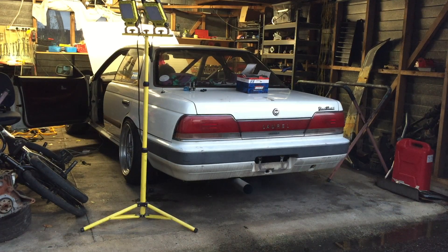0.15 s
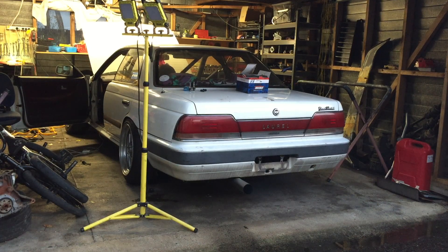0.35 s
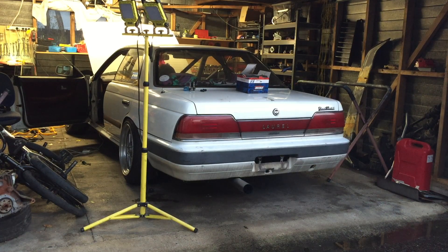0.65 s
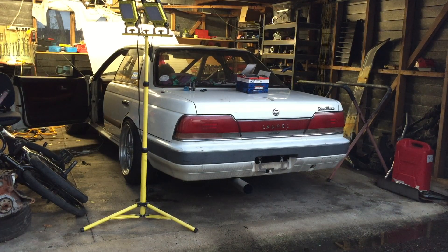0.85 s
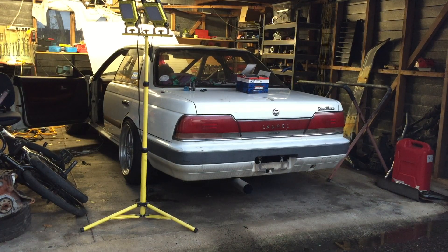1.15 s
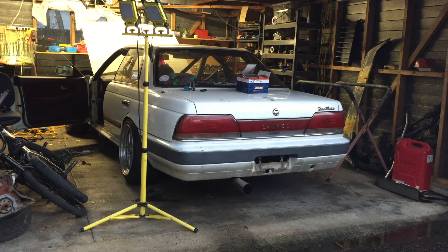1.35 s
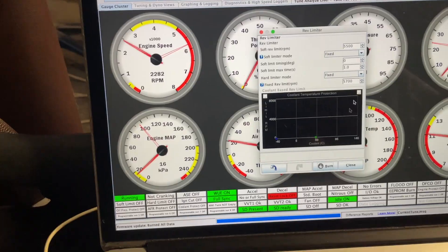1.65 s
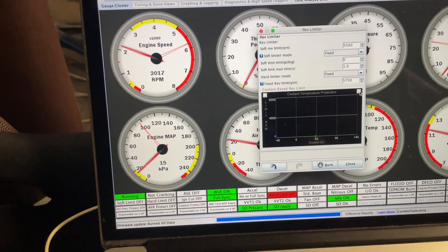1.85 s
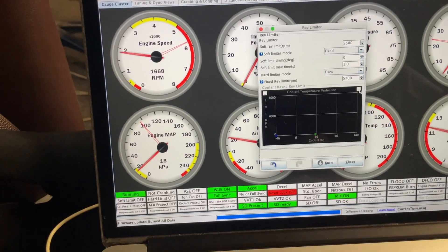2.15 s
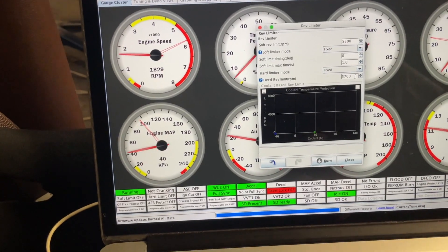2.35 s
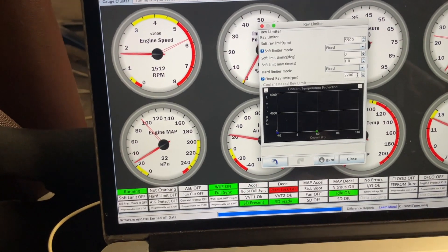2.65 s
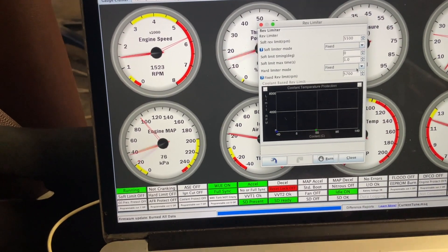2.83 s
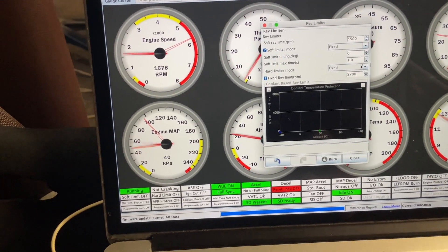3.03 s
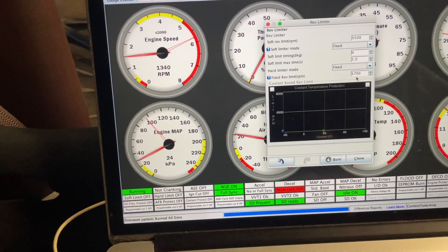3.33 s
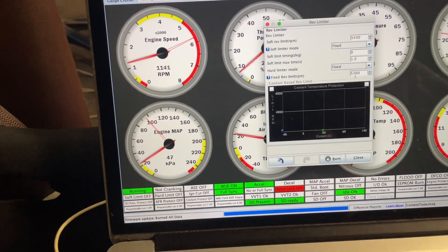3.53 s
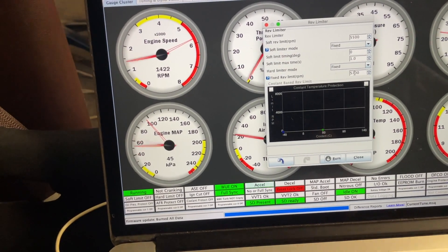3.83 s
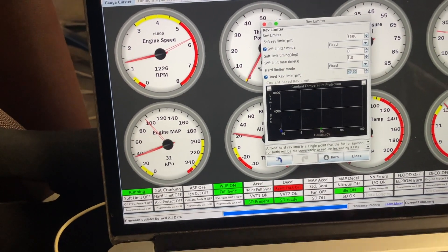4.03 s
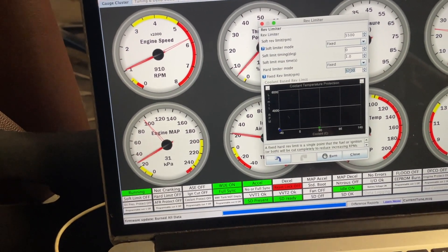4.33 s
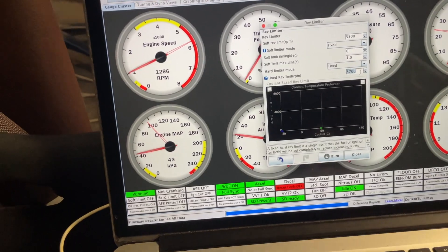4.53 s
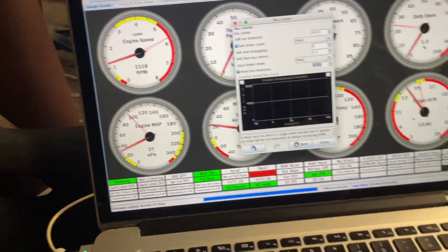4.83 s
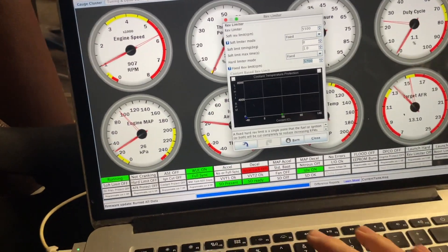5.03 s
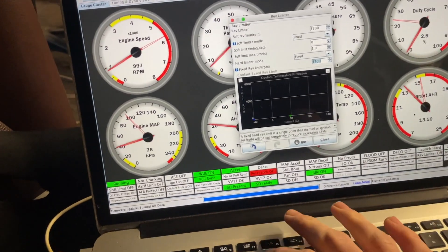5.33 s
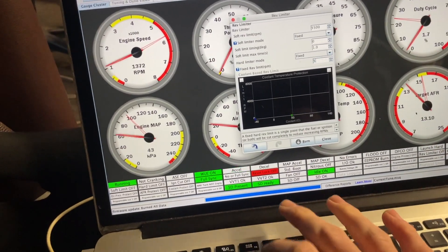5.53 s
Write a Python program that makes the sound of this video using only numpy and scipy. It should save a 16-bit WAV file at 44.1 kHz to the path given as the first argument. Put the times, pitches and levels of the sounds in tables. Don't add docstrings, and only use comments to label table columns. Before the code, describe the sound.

Raspy exhaust revs with sharp cracks cut suddenly to a low cabin drone, repeatedly blipped while sinking toward idle, with faint laptop key ticks.

```python
import sys
import numpy as np
from scipy import signal
from scipy.fft import rfft, irfft, next_fast_len
from scipy.io import wavfile
from scipy.ndimage import uniform_filter1d

SR = 44100
rng = np.random.default_rng(int(sys.argv[2]) if len(sys.argv) > 2 else 0)


def wav_out(sig):
    wavfile.write(sys.argv[1], SR, np.round(np.clip(np.atleast_2d(sig).T, -1, 1) * 32767).astype(np.int16))


def nominal_scale(level):
    x = np.asarray(level, float) / 20
    return 10 ** x


N = 250488
CUT_S = 1.602

# (frequency [Hz], level [dB per Hz])
GARAGE_WHIRR = [(140, -30), (230, 7.5), (492, -10), (1470, -24.5), (2330, -42.5), (3040, -29), (3770, -24),
                (12000, -42), (15600, -70.5), (22000, -120)]
# (frequency [Hz], level [dB per Hz])
CABIN_WHIRR = [(140, -39), (230, -3), (266, -14.5), (417, -7), (826, -18.5), (1710, -18), (2000, -23.5),
               (5620, -37), (7400, -40), (9620, -77.5), (16300, -120)]
GARAGE_WHIRR_DB, CABIN_WHIRR_DB = -38, -48.5

# (time [s], peak [dB], pitch [Hz])
KEY_TICKS = [
    (4.795, -48, 4500),
    (5.089, -47, 5070),
    (5.570, -50, 10000),
    (5.576, -41, 21000),
    (5.574, -44.5, 5500),
]
# (time [s], pitch [Hz], level [dB])
PUMP_WHINES = [
    [(2.45, 805, -49), (2.7, 795.3, -48), (2.9, 785, -45), (3.1, 751, -50.5), (3.3, 728, -51)],
    [(3.7, 706, -48), (3.9, 647, -48), (4.05, 677, -53), (4.25, 627, -52)],
]

# (frequency [Hz], level [dB per Hz])
TAIL_HISS = [(350, -38), (600, -1.5), (768, -10.5), (1040, 3.5), (1180, -1), (1430, 3.5), (2040, -2),
             (2270, -10.5), (2990, -7), (3730, -19), (4400, -14.5), (5630, -20), (9490, -22), (15100, -33),
             (16000, -44.5)]
# (frequency [Hz], level [dB per Hz])
CABIN_HISS = [(350, -37), (600, -27), (633, -10), (785, -10), (961, -14), (1190, -10.5), (1290, -14),
              (1740, -11), (2020, -15), (3900, -19.5), (7150, -28.5), (7960, -53.5), (9240, -32),
              (11500, -38), (15000, -61)]
# (frequency [Hz], width [Hz], level [dB])
PIPE = [(261, 79, -3), (348, 37, -1.5), (434.6, 31, -1.5), (532, 30, -3)]
# (frequency [Hz], width [Hz], level [dB])
TIP = [(1180, 30, -14), (1374, 133, 31), (1760, 77, -20.5), (1876, 180, 15.5), (3160, 220, 17.5),
       (4350, 400, -38)]
# (frequency [Hz], width [Hz], level [dB])
PANELS = [(278, 20, -7.5), (325.4, 28, -4), (359.4, 13.5, 1), (405.7, 5.2, 10), (440, 37, -1),
          (568, 56, 0.5)]
# (frequency [Hz], width [Hz], level [dB])
DASH = [(730, 430, -8.5), (1205, 35, 8.5), (1320, 110, -7.5), (2010, 150, 0), (2550, 25, -13)]
# (time [s], peak [dB])
CRACKS = [
    (0.1726, -25.5),
    (0.1932, -16.5),
    (0.7636, -28.5),
    (0.8509, -45),
    (1.0098, -34),
    (1.034, -24),
    (1.053, -12.5),
    (1.1318, -15),
    (1.1724, -13),
]

# (frequency [Hz], side minus mid [dB])
CABIN_SIDE = [(60, -26.5), (125, -13), (250, -7.5), (500, -9), (1500, -2.5), (8000, -0.5)]
# (frequency [Hz], level [dB])
CABIN_MICROPHONE = [(30, 0), (7550, 0), (7650, -45), (8800, -45), (8950, 0), (13000, 0), (13800, -30)]

# (time [s], firing rate [Hz])
TAIL_REVS = [(0.0, 49.1), (0.154, 46.45), (0.4, 68.91), (0.86, 42.82), (0.976, 40.92), (1.068, 51.2),
             (1.118, 45.97), (1.354, 69.25), (1.6, 56.5)]
# (time [s], firing rate [Hz])
CABIN_REVS = [(1.61, 109.2), (2.055, 80.46), (2.25, 92.8), (2.63, 71.1), (2.705, 74.7), (2.75, 72.75),
              (2.88, 87), (3.385, 55.8), (3.46, 65), (3.52, 58.45), (3.66, 75.05), (4.175, 45.02),
              (4.47, 67.46), (5.0, 39.8), (5.12, 49.6), (5.175, 45.8), (5.42, 70.4), (5.68, 55.73)]
CLIMB_BEND = 1.3

# (time [s], held [s], first load [0-1], last load [0-1])
TAIL_PEDAL = [
    (-0.05, 0.15, 0.19, 0),
    (0.156, 0.22, 0.81, 0.33),
    (0.994, 0.09, 0.78, 1),
    (1.111, 0.04, 0.6, 0.45),
    (1.146, 0.16, 0.89, 0.71),
]
# (time [s], held [s], first load [0-1], last load [0-1])
CABIN_PEDAL = [
    (2.054, 0.11, 0.46, 0.7),
    (2.642, 0.076, 0.74, 0.9),
    (2.748, 0.15, 0.82, 0.3),
    (3.385, 0.11, 0.82, 1.03),
    (3.528, 0.11, 0.9, 0.69),
    (4.202, 0.29, 0.41, 0.49),
    (5.048, 0.11, 0.51, 0.95),
    (5.192, 0.22, 0.95, 0.95),
]
TAIL_PRESS_S, TAIL_LIFT_S = 0.064, 0.06
CABIN_PRESS_S, CABIN_LIFT_S = 0.043, 0.064
STUMBLE_S, GULP_S = 0.09, 0.12

# (time [s], held [s], first strength [0-1], last
TAIL_BURN = [
    (0.14, 0.206, 0.48, 0.5),
    (0.987, 0.12, 0.52, 0.65),
    (1.124, 0.16, 0.55, 0.6),
]
# (time [s], held [s], first strength [0-1], last strength [0-1])
CABIN_BURN = [
    (2.07, 0.15, 0.62, 0.74),
    (2.66, 0.056, 0.55, 0.52),
    (2.771, 0.11, 0.58, 0.78),
    (3.39, 0.105, 0.4, 0.64),
    (3.541, 0.15, 0.46, 0.49),
    (4.19, 0.22, 0.36, 0.6),
    (5.05, 0.091, 0.44, 0.47),
    (5.186, 0.22, 0.47, 0.74),
]
CATCH_S, FADE_S = 0.041, 0.065
# (time [s], held [s], first depth [0-1], last depth [0-1])
FUEL_LULLS = [
    (0.8, 0.17, 0.57, 0.5),
    (4.86, 0.17, 0.35, 0.7),
]
LULL_LOAD, LULL_DB = 0.96, -6.5

# (frequency [Hz], pumping on shut throttle [dB], burning at full load [dB])
TAIL_BOOM = [(43.2, -42, -44), (51.7, -21, -10.5), (57.6, -28.5, -12.5), (79, -25.5, -19),
             (112.5, -31, -14), (119.2, -18.5, -10.5), (141, -30, -19.5), (176.7, -22.5, -15),
             (248, -25.5, -16), (270, -64, -28.5)]
# (frequency [Hz], pumping on shut throttle [dB], burning at full load [dB])
CABIN_BOOM = [(39, -31.5, -21), (48, -20, -17), (65, -29, -16.5), (81.2, -24, -15.5), (97, -21.5, -11.5),
              (111, -24.5, -15.5), (149, -24.5, -17.5), (160.3, -32, -16.5), (177, -25, -21.5),
              (225, -43, -29.5), (280, -60.5, -38), (400, -82, -48.5)]
TAIL_ORDERS_DB = [-1.2, 1.73, -0.9, -10.5]
CABIN_ORDERS_DB = [0.55, -3.5, -6, -11]
BURN_ORDERS_DB = [-1, 1, 0.55, 4]
# (frequency [Hz], -1 opposed to 1 together)
TAIL_CLASH = [(60, -1), (130, -0.9), (165, -0.2), (200, 0.5)]
# (frequency [Hz], -1 opposed to 1 together)
CABIN_CLASH = [(60, -1), (100, -1), (140, -0.5), (170, 0.5)]
NOTE_WANDER_DB = 0.7

# (coasting at 60 Hz [dB], speed [dB per Hz], full load [dB], stumble after a lift [dB], snap open [dB])
TAIL_LAWS = [(-31, 0.8, 2.5, -12.5, 10.2), (-31.5, 0.25, -13, 29.5, 6), (-39.5, 0.07, 11, 2, 0.5),
             (-52, 0.58, 21.5, 2, 1.5), (-55, 0.27, 15.5, -3.5, 8)]
# (coasting at 60 Hz [dB], speed [dB per Hz], full load [dB], stumble after a lift [dB], snap open [dB])
CABIN_LAWS = [(-48.5, 0.17, 10.5, 4.9, 1.7), (-36, 0.01, 10, 17, 0.1), (-56.5, 0.14, 9.5, 0.1, 5.4),
              (-70.5, 0.17, 13.5, 0.1, 0.1), (-76.5, 0.099, 3.5, 0.1, 14)]


def unit(x):
    return x / np.sqrt(np.mean(x ** 2))


def read(table):
    s, *columns = np.transpose(table)
    return [np.interp(np.arange(N) / SR, s, column) for column in columns]


def colour(x, points):
    hz, db = np.transpose(points)
    size = next_fast_len(N + SR)
    log_hz = np.log(np.arange(size // 2 + 1) * SR / size + 1)
    gain = nominal_scale(np.interp(log_hz, np.log(hz), db, left=-90, right=-90))
    return irfft(rfft(x, size) * gain, size)[:N]


def ring(x, modes):
    out = 0
    for k, (hz, width_hz, db) in enumerate(modes):
        b, a = signal.iirpeak(hz, hz / max(width_hz, 5), SR)
        out = out + (-1) ** k * nominal_scale(db) * signal.lfilter(b, a, x)
    return out


def flicker(rate):
    hold = int(SR / rate)
    steps = np.repeat(rng.standard_normal(N // hold + 1), hold)
    return 1.03 * uniform_filter1d(steps, hold)[:N]


def lagging(x, lag_s):
    keep = np.exp(-1 / (lag_s * SR))
    return signal.lfilter([1 - keep], [1, -keep], x)


def echoes(x, t60_s, wet_db):
    t = np.arange(int(0.5 * SR)) / SR
    tail = rng.standard_normal(len(t)) * np.exp(-np.log(1000) * t / t60_s) * (t > 0.002)
    tail = tail / np.linalg.norm(tail)
    return x + nominal_scale(wet_db) * signal.fftconvolve(x, tail)[:N]


def bursts(events, decay_s):
    start = np.zeros(N)
    for s, db, *_ in events:
        start[int(s * SR)] = nominal_scale(db)
    envelope = signal.lfilter([1], [1, -np.exp(-1 / (decay_s * SR))], start)
    return envelope * rng.standard_normal(N)


def split(x, edges_hz, levels_db):
    low, under = (signal.sosfiltfilt(signal.butter(2, hz, fs=SR, output="sos"), x) for hz in edges_hz)
    parts = (low, under - low, x - under)
    return [nominal_scale(db) * unit(part) for db, part in zip(levels_db, parts)]


def whirr(points, db):
    return nominal_scale(db + flicker(15)) * unit(colour(rng.standard_normal(N), points))


def keys():
    return sum(ring(bursts([key], 0.00062), [(key[2], 1800, 9)]) for key in KEY_TICKS)


def whine():
    out = np.zeros(N)
    t = np.arange(N) / SR
    for table in PUMP_WHINES:
        hz, db = read(table)
        begin_s, end_s = table[0][0], table[-1][0]
        on = np.clip(np.minimum(t - begin_s, end_s - t) / 0.017, 0, 1)
        level = on * nominal_scale(db - 3 + 2 * flicker(25))
        out += level * np.sin(2 * np.pi * np.cumsum(hz + 10 * flicker(40)) / SR)
    return out


def revs(table):
    s, hz = np.transpose(table)
    place = np.interp(np.arange(N) / SR, s, np.arange(len(s)) * (1 - 1e-9))
    k = place.astype(int)
    part, step = place - k, np.diff(hz)[k]
    climb = np.sin(np.pi / 2 * part) ** CLIMB_BEND
    return hz[k] + step * np.where(step > 0, climb, part)


def strokes(rows, rise_s, fall_s):
    t = np.arange(N) / SR
    out = 0
    for s, held, first, last in rows:
        corners_s = np.cumsum([s, rise_s, max(held - rise_s, 1e-3), fall_s])
        out = out + np.interp(t, corners_s, [0, first, last, 0])
    return out


def firing(hz, start):
    turns = start + np.cumsum(hz) / SR
    return turns, rng.standard_normal((1000, 2))[turns.astype(int)].T


def kicks(turns, luck, scatter_db, hz):
    clicks = np.diff(np.floor(turns), prepend=np.floor(turns[0]))
    return clicks * nominal_scale(scatter_db * luck) / np.sqrt(hz)


def gas(turns, luck, hiss, puff, steady, scatter_db):
    late = turns % 1 - np.clip(0.11 + 0.08 * luck[0], 0, 0.4)
    puffs = (late > 0) * np.exp(-late / puff) * nominal_scale(scatter_db * luck[1])
    gate = steady * nominal_scale(2.0 * flicker(150)) + puffs
    return colour(gate * rng.standard_normal(N), hiss)


def roar(turns, luck, bay_db, intake_db, air_db):
    flow = gas(turns, luck, CABIN_HISS, puff=0.76, steady=1.0, scatter_db=0.5)
    flow = unit(flow) + nominal_scale(-4.5) * unit(ring(flow, DASH))
    flow = echoes(flow, t60_s=0.23, wet_db=-4)
    intake = rng.standard_normal(N) * nominal_scale(3.7 * flicker(40))
    intake = ring(intake, [(3870, 1300, 0.2), (4640, 400, 0.0082)])
    intake = nominal_scale(1.6 * (intake_db + 56) - 56) * unit(intake)
    flow = sum(split(flow, (2400, 8000), (bay_db, intake_db + 0.5, air_db)))
    return flow + intake + whirr(CABIN_WHIRR, CABIN_WHIRR_DB - 3.5)


def buzz(turns, luck, hz):
    rattle = rng.standard_normal(N) * nominal_scale(1.4 * flicker(25))
    shake = unit(kicks(turns, luck, 4.0, hz)) * nominal_scale(-7.5) + rattle
    return unit(colour(ring(shake, PANELS), [(200, -31.5), (250, 10.5), (650, -4.0), (900, -17)]))


def cracks():
    snaps = nominal_scale(2) * bursts(CRACKS, 0.0032)
    snaps = ring(snaps, [(1716, 1400, -0.5), (4370, 2800, -6), (8500, 4000, -13.5)])
    return echoes(snaps, t60_s=0.15, wet_db=-5.5)


def rasp(turns, luck, levels_db):
    puffs = gas(turns, luck, TAIL_HISS, puff=0.23, steady=0.31, scatter_db=0.0)
    puffs = unit(puffs) + nominal_scale(-2) * unit(ring(puffs, TIP))
    puffs = echoes(puffs, t60_s=0.1, wet_db=-3.5)
    spits = gas(turns, luck, TAIL_HISS, puff=0.38, steady=0.2, scatter_db=3)
    low, middle, _ = split(puffs, (3400, 5800), levels_db)
    jet = split(spits, (3400, 5800), levels_db)[2]
    return low + middle + jet


def overtones(turns, luck, hz):
    struck = ring(kicks(turns, luck, 2.5, hz), PIPE)
    blown = ring(rng.standard_normal(N), PIPE)
    upper = unit(struck) + nominal_scale(-5.5) * unit(blown)
    return unit(colour(upper, [(180, -10), (240, 10), (600, -13), (900, 8.5)]))


def drone(turns, luck, hz, levels_db, uneven_db, drift):
    clean = 0
    for k, db in enumerate(levels_db):
        phase = 2 * np.pi * (k + 1) * turns + k * k + drift * flicker(3)
        clean = clean + np.sqrt(2) * nominal_scale(db + 2.0 * flicker(20)) * np.cos(phase)
    lumps = kicks(turns, luck, 0, hz) * luck
    lumps = colour(lumps, [(44, -23.5), (56, -7), (120, -3.5), (215, -9.0), (250, -40.5)])
    return clean + nominal_scale(uneven_db) * unit(lumps)


def engine(speed, pedal, press_s, lift_s, boom, orders_db, laws, clash, burns):
    hz = revs(speed)
    load = strokes(pedal, press_s, lift_s)
    burn = strokes(burns, CATCH_S, FADE_S)
    stumble = np.clip(lagging(load, STUMBLE_S) - load, 0, 1)
    gulp = np.clip(load - lagging(load, GULP_S), 0, 1)
    lull = strokes(FUEL_LULLS, CATCH_S, CATCH_S)
    load = load - LULL_LOAD * lull
    full_burns = [(s, held, 1, 1) for s, held, *_ in burns]
    shut = np.clip(1 - strokes(full_burns, CATCH_S, FADE_S), 0, 1)

    boom_hz, pump_db, burn_db = np.transpose(boom)
    clash_hz, together = np.transpose(clash)
    notes_db = []
    for k, order_db in enumerate(orders_db, 1):
        log_hz = np.log(k * hz)
        pumping = shut * nominal_scale(np.interp(log_hz, np.log(boom_hz), pump_db))
        burning = burn * nominal_scale(np.interp(log_hz, np.log(boom_hz), burn_db + BURN_ORDERS_DB[k - 1]))
        angle = np.arccos(np.clip(np.interp(k * hz, clash_hz, together), -1, 1))
        note = np.abs(pumping + burning * np.exp(1j * angle))
        wander_db = NOTE_WANDER_DB * flicker(9)
        notes_db.append(order_db + LULL_DB * lull + wander_db + 20 * np.log10(note + 1e-3))

    layers_db = []
    for db, slope, push, trip, snap in laws:
        layers_db.append(db + slope * (hz - 60) + push * load + trip * stumble + snap * gulp)
    return hz, notes_db, layers_db


def cabin():
    hz, notes_db, layers_db = engine(CABIN_REVS, CABIN_PEDAL, CABIN_PRESS_S, CABIN_LIFT_S, CABIN_BOOM,
                                     CABIN_ORDERS_DB, CABIN_LAWS, CABIN_CLASH, CABIN_BURN)
    buzz_db, uneven_db, *gas_db = layers_db
    turns, luck = firing(hz, 0.256)
    boom = drone(turns, luck[0], hz, notes_db, uneven_db, drift=0.7)
    boom = echoes(boom, t60_s=0.65, wet_db=-13)
    mid, side = (nominal_scale(buzz_db) * buzz(turns, luck[0], hz) + roar(turns, luck, *gas_db) for _ in range(2))
    width = [(30, CABIN_SIDE[0][1])] + list(CABIN_SIDE) + [(16000, CABIN_SIDE[-1][1])]
    side = colour(side - np.roll(boom, int(0.00086 * SR)), width)
    mid = mid + boom + whine() + keys()
    return np.array([colour(mid + side, CABIN_MICROPHONE), colour(mid - side, CABIN_MICROPHONE)])


def behind():
    hz, notes_db, layers_db = engine(TAIL_REVS, TAIL_PEDAL, TAIL_PRESS_S, TAIL_LIFT_S, TAIL_BOOM,
                                     TAIL_ORDERS_DB, TAIL_LAWS, TAIL_CLASH, TAIL_BURN)
    upper_db, uneven_db, *gas_db = layers_db
    turns, luck = firing(hz, 0.28)
    upper = nominal_scale(upper_db) * overtones(turns, luck[0], hz)
    boom = drone(turns, luck[0], hz, notes_db, uneven_db, drift=1.0)
    puffs = rasp(turns + 0.67, luck, gas_db)
    return boom + upper + puffs + cracks() + whirr(GARAGE_WHIRR, GARAGE_WHIRR_DB - 2.0)


def scene():
    inside = np.clip((np.arange(N) / SR - CUT_S) / 0.00028, 0, 1)
    return (1 - inside) * behind() + inside * cabin()


def roll_off(x):
    return signal.sosfilt(signal.butter(12, 16480, fs=SR, output="sos"), x)


def record(dry):
    x = signal.sosfilt(signal.butter(5, 45, "high", fs=SR, output="sos"), dry)
    x = signal.sosfilt(signal.ellip(8, 0.2, 60, 15900, fs=SR, output="sos"), x)
    close = np.clip((N - 1 - np.arange(N)) / (0.004 * SR), 0, 1)
    mix = close * 0.58 * np.tanh(x / 0.57)
    return roll_off(mix)


dry = scene()
out = record(dry)
wav_out(out)
```